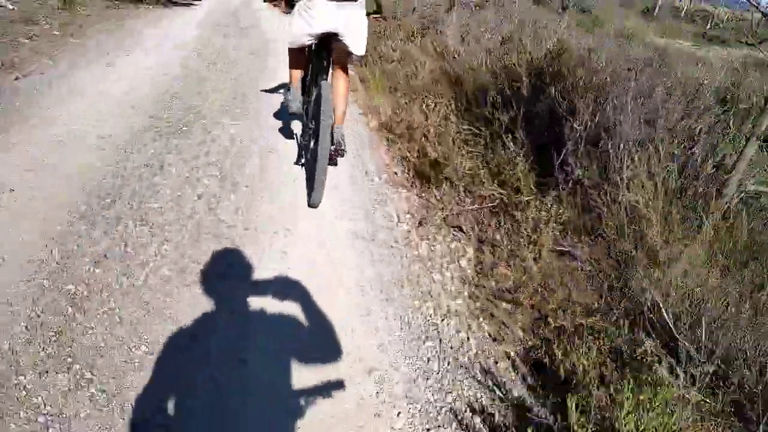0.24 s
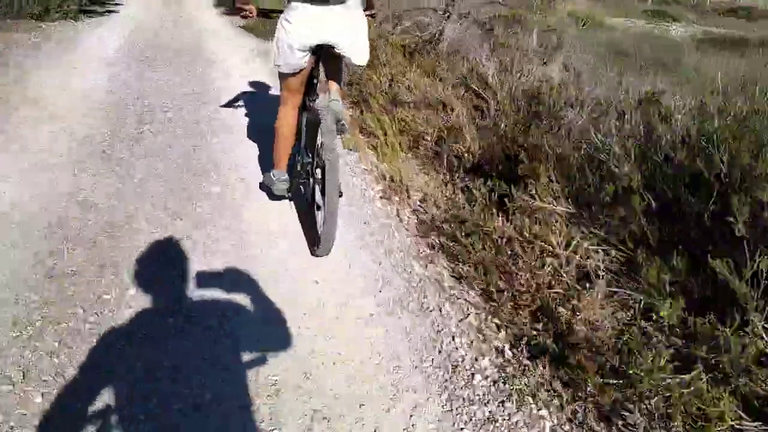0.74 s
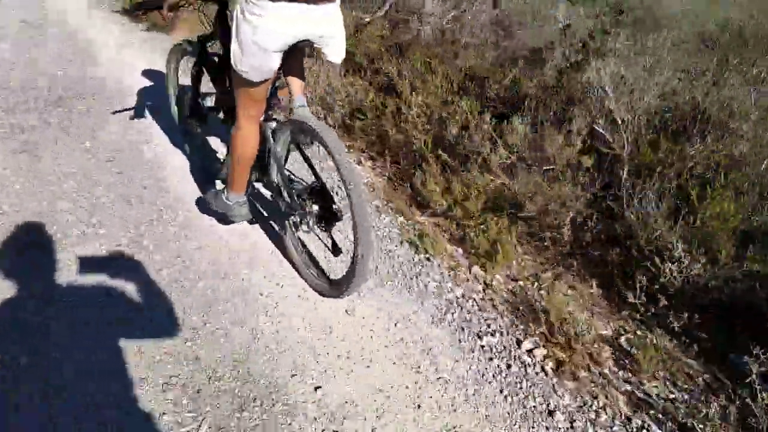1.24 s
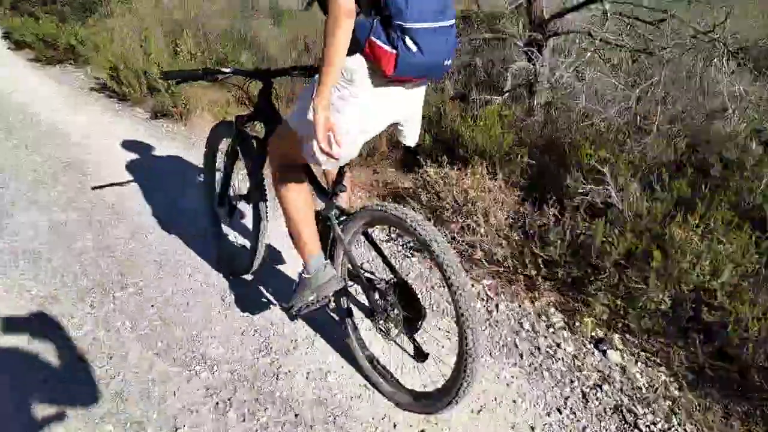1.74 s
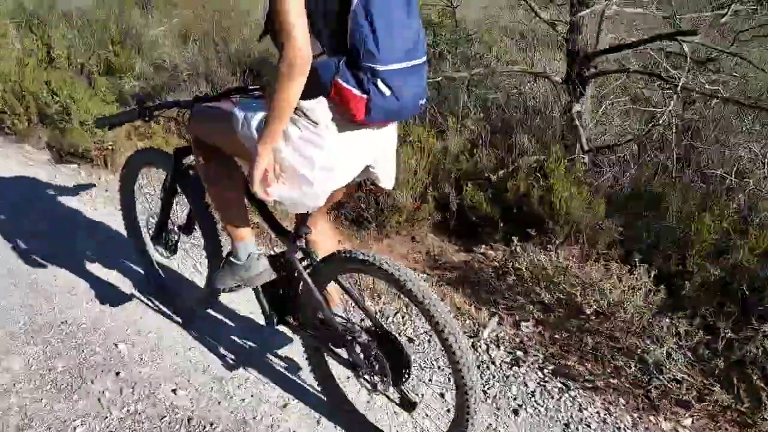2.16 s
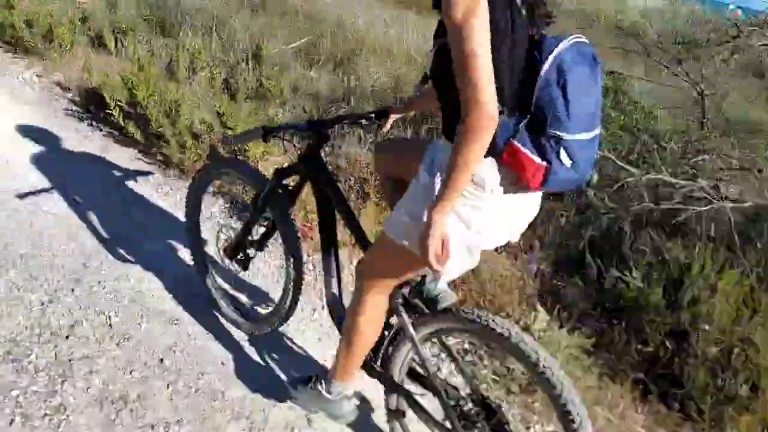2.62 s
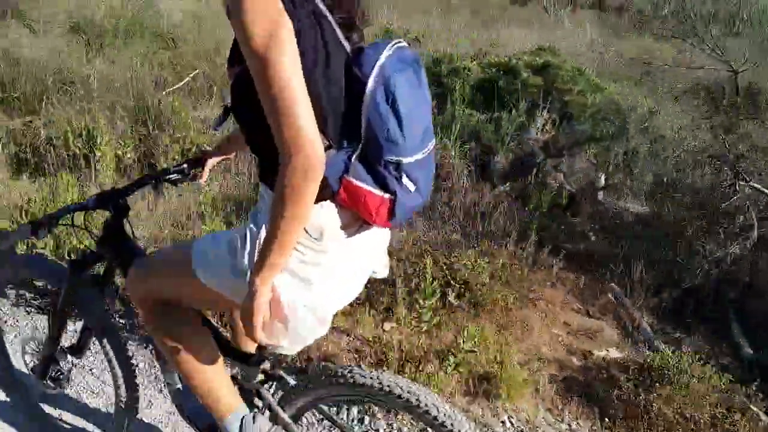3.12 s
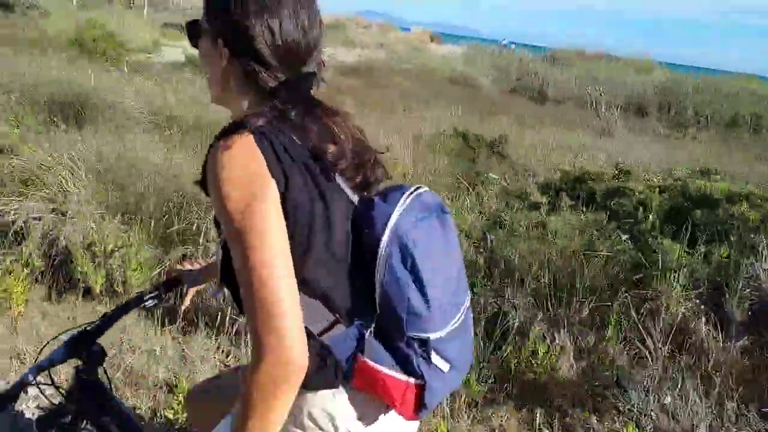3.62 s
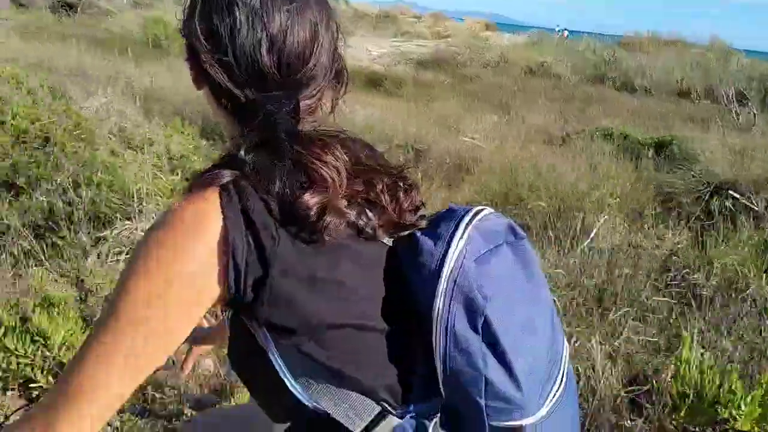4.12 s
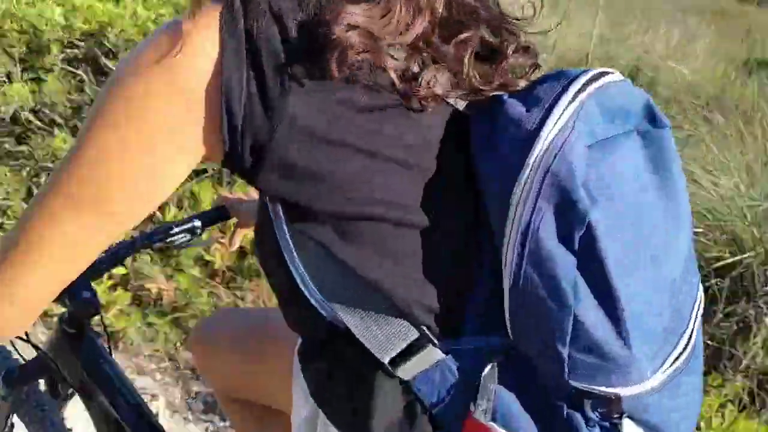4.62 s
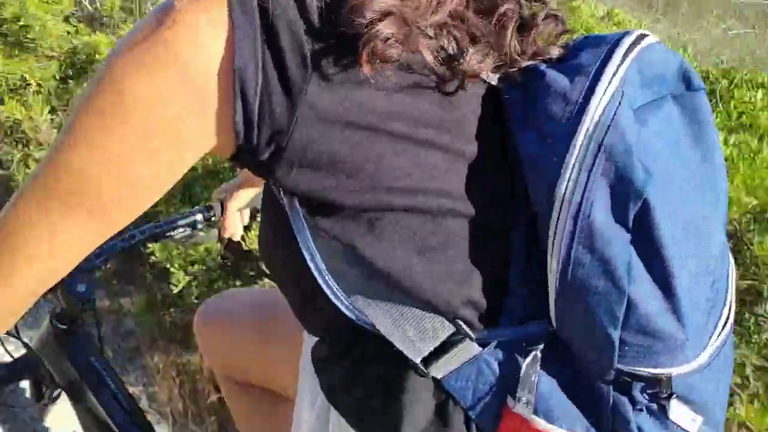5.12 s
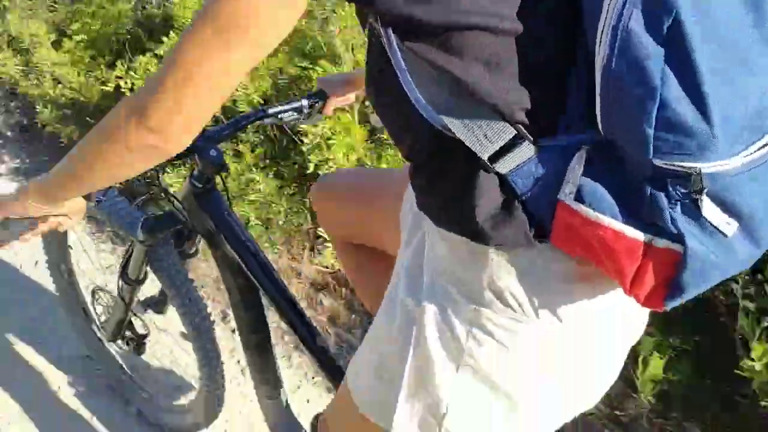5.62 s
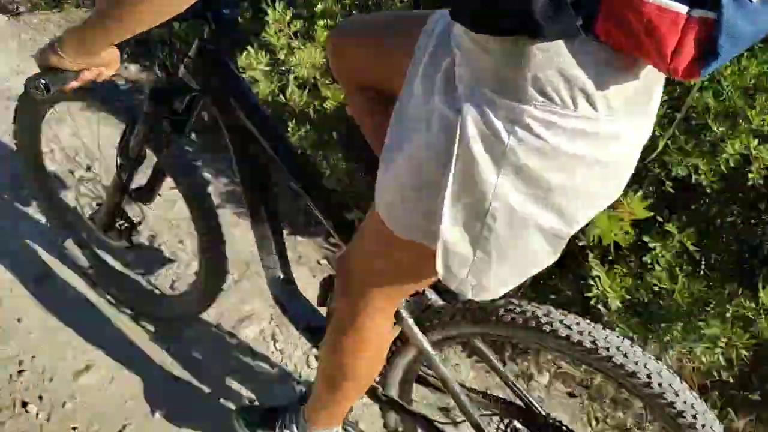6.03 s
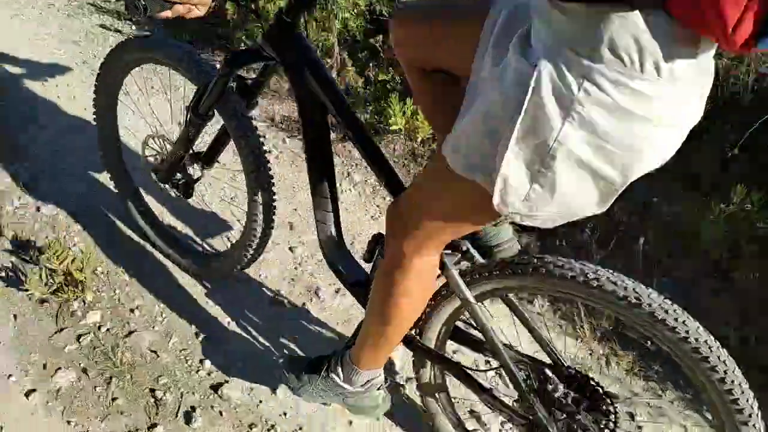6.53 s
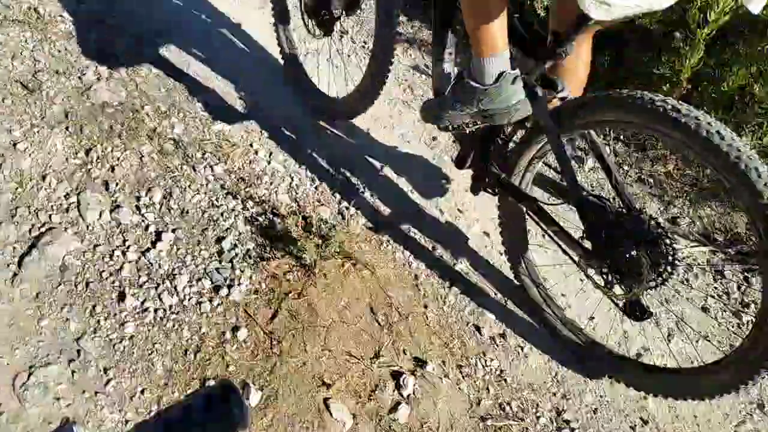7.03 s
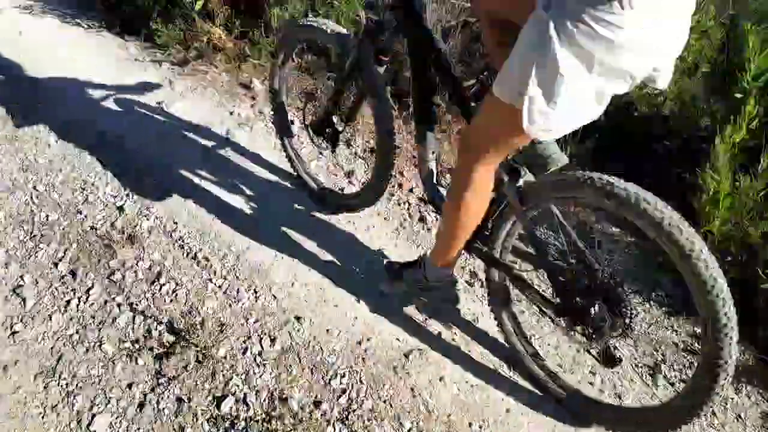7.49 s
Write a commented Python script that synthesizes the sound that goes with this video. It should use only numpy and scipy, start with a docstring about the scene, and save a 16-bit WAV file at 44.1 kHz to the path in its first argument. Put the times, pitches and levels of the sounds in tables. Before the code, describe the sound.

Mountain bikes roll along a stony track outdoors, grit hissing, stones pinging, chain slapping early, ratchet clicking, low wind buffeting unevenly.

```python
"""On a loose gravel track, mountain bikes roll slowly past the stones, heard from a phone in a rider's hand.
Wind is slow and sharp shaped noise with gusts, a higher roar and single low thumps; faint peeps are pure tones.
Noise bursts make the freewheel's timed ratchet teeth, the chain's slaps in two bands and loud bright clicks.
Stones pop as short swelling wavelets; the tyres crunch, hiss and rumble in clicks, tiny wavelets and noise."""
import sys
import numpy as np
from scipy import signal
from scipy.fft import rfft, irfft, next_fast_len
from scipy.io import wavfile
from scipy.ndimage import uniform_filter1d, map_coordinates

SR = 44100
rng = np.random.default_rng(int(sys.argv[2]) if len(sys.argv) > 2 else 0)


def unload_audio(sound):
    """Save the sound as a 16-bit wav file, at the path given as the first command line argument."""
    columns = np.transpose(np.atleast_2d(sound))
    # keep every value between -1 and 1, then stretch to whole-number steps
    steps = np.round(np.clip(columns, -1, 1) * 32767)
    wavfile.write(sys.argv[1], SR, steps.astype(np.int16))


N = 342216  # samples


def amp(db):
    """Gain of a level in dB."""
    return 10 ** (np.asarray(db) / 20)


def unit(x):
    """x at rms 1."""
    return x / np.sqrt(np.mean(x ** 2) + 1e-20)


def curves(rows):
    """One value per sample for each column after the time."""
    seconds, *columns = np.transpose(rows)
    t = np.arange(N) / SR
    return [np.interp(t, seconds, column) for column in columns]


def wobble(rate):
    """A smooth random curve, rate knots a second."""
    knots = rng.standard_normal(int(N * rate / SR) + 4)
    return map_coordinates(knots, [np.arange(N) * rate / SR])


def filtered(x, response):
    """x times a complex response of frequency."""
    size = next_fast_len(N + SR // 2)
    hz = np.fft.rfftfreq(size, 1 / SR)
    return irfft(rfft(x, size) * response(hz), size)[:N]


def colour(points):
    """Response through (Hz, dB) points on a log frequency axis."""
    f, db = np.transpose(points)
    return lambda hz: amp(np.interp(np.log(hz + 1), np.log(f + 1), db))


def resonances(modes):
    """Causal response of (Hz, width in Hz, dB) resonances, summed with alternating sign."""
    def response(f):
        total = 0
        for k, (centre, width, db) in enumerate(modes):
            damping = 1j * f * width
            total = total + (-1) ** k * amp(db) * damping / (centre ** 2 - f ** 2 + damping)
        return total
    return response


# Resonances of the microphone port. Each row: centre in Hz, width in Hz, gain in dB.
PORT_MODES = [(2130, 1030, -5.5), (4434, 1505, -1.5), (7804, 694, -4), (15980, 1450, 4.5)]


def through_port(x, points):
    """x in the colour of its source and of the microphone port."""
    return filtered(x, lambda hz: colour(points)(hz) * resonances(PORT_MODES)(hz))


def envelope(times, dbs, rise, t60):
    """Sum of quick swells and decays, each starting at its time; rise and t60 in seconds."""
    starts = np.bincount((np.asarray(times) * SR).astype(int), amp(dbs), N)[:N]
    t = np.arange(SR // 20) / SR
    swell = (1 - np.exp(-t / rise)) * amp(-60 * t / t60)
    return np.abs(signal.fftconvolve(starts, swell)[:N])


def wavelet(hz, cycles, phase, size):
    """Rows of sine that swell to a peak near 1 after the given cycles, then die fast."""
    u = np.arange(size) / SR * np.asarray(hz)[..., None] / cycles  # time over time of peak
    return np.sin(2 * np.pi * cycles * u + phase) * (u * np.exp(1 - u)) ** 2


def placed(times, rows):
    """Each row added at its time."""
    at = (np.asarray(times)[:, None] * SR).astype(int) + np.arange(rows.shape[1])
    return np.bincount(at.ravel(), rows.ravel(), N)[:N]


def steady(points, seconds):
    """Coloured noise with its own swells partly evened out over a short window."""
    x = filtered(rng.standard_normal(N), colour(points))
    power = np.abs(uniform_filter1d(x ** 2, int(seconds * SR)) + 1e-9)
    return unit(x / power ** 0.34)


def patchy(depth_db):
    """Noise whose colour changes from moment to moment."""
    z = signal.stft(rng.standard_normal(N), nperseg=256)[2]
    field = uniform_filter1d(rng.standard_normal(z.shape), size=5, axis=0)  # blurred over frequency
    field = uniform_filter1d(field, size=4, axis=1)  # and over time
    return signal.istft(z * amp(depth_db * unit(field)), nperseg=256)[1][:N]


# Faint high peeps. Each row: start in seconds, level in dB.
PEEPS = [(2.35, -50), (4.765, -52), (4.865, -48)]


def peeps():
    """Faint, short, high tones: a sine that swells for 80 cycles and dies."""
    s, db = np.transpose(PEEPS)
    tones = wavelet(np.full(len(s), 11050), 80, 0, size=SR // 20)
    return placed(s, amp(db)[:, None] * tones)


# Changing breeze on the port. Each row: time in seconds, level in dB.
BREEZE = [(0, -36), (.4, -34), (.6, -31.5), (1.17, -43.5), (1.42, -35), (1.68, -38.5), (1.74, -34),
          (2.33, -37.5), (2.4, -55), (2.62, -35.5), (3.2, -33), (3.5, -44), (4.04, -31), (4.36, -46),
          (4.73, -27), (5.2, -42), (5.28, -32), (6.28, -35), (6.45, -32.5), (6.88, -48), (7.76, -35.5)]
# Separate gusts, strong and weak. Each row: start in seconds, length of the body in seconds, peak level in dB.
GUSTS = [(0.048, .13, -24.5), (0.438, .11, -21.5), (0.738, 0.29, -27), (3.67, .17, -18.5),
         (3.9, 0.054, -26.5), (4.09, 0.094, -21.5), (4.228, 0.03, -38), (6.52, .1, -22.5),
         (6.998, 0.31, -33), (7.38, 0.11, -36)]
GUST_RISE_S, GUST_FALL_S = 0.026, 0.032
GUST_ONSET, GUST_PEAK_AT, GUST_END = 0.48, 0.66, 0.51  # gain after the rise, peak's place in the body, end gain


def wind_db():
    """The breeze with the gusts on top: each sets in, swells to a peak and drops away."""
    breeze_db, = curves(BREEZE)
    t = np.arange(N) / SR
    gusts = np.zeros(N)
    for start, body, db in GUSTS:
        spans = [0, GUST_RISE_S, GUST_PEAK_AT * body, (1 - GUST_PEAK_AT) * body, GUST_FALL_S]
        shape = np.interp(t, start + np.cumsum(spans), [0, GUST_ONSET, 1, GUST_END, 0])
        gusts += amp(db) * shape
    return 20 * np.log10(amp(breeze_db) + gusts)


# Balance of the sharp eddies. Each row: time in seconds, level over the buffet in a middling wind in dB.
EDDY_BALANCE = [(0, -13), (2.3, -14.5), (3, -6.5), (4.2, -7), (5.2, -15.5), (6.2, -4.5), (6.6, -9),
                (7.76, -12.5)]
# Colour of the slow buffeting. Each row: frequency in Hz, gain in dB.
BUFFET_COLOUR = [(8.8, -52), (15, 5), (45, 8), (128, -2.5), (268, -28), (300, -47), (390, -74), (660, -120)]
# Colour of the sharp eddies. Each row: frequency in Hz, gain in dB.
EDDY_COLOUR = [(60, -37), (130, 8), (250, -1), (450, -18.5), (900, -20), (2000, -94)]
# Colour of the higher roar. Each row: frequency in Hz, gain in dB.
ROAR_COLOUR = [(200, 0), (400, 8), (800, -12), (1500, -38)]
MIDDLING_DB = -35
EDDY_GROWS, ROAR_GROWS = 0.87, 1.96  # dB per dB: eddies with the buffet, roar with the eddies
ROAR_DB = -18  # roar over the eddies when these are at the middling level


def wind():
    """Pressure lumps on the port; small eddies come in shorter bursts, and stronger wind roars higher."""
    eddy_db, = curves(EDDY_BALANCE)
    buffet_db = wind_db() + 2.37 * wobble(8)
    sharp_db = MIDDLING_DB + eddy_db + EDDY_GROWS * (buffet_db - MIDDLING_DB)
    roar_db = sharp_db + ROAR_DB + (ROAR_GROWS - 1) * (sharp_db - MIDDLING_DB)
    lumps = wobble(18)
    flutter = amp(2 * lumps + 3 * wobble(45))
    buffet = unit(amp(2.7 * lumps) * steady(BUFFET_COLOUR, 0.0635))
    eddies = unit(flutter * steady(EDDY_COLOUR, 0.031))
    roar = unit(flutter * steady(ROAR_COLOUR, 0.022))
    return amp(buffet_db) * buffet + amp(sharp_db) * eddies + amp(roar_db) * roar


# Single eddies hitting the port. Each row: start in seconds, level in dB, pitch in Hz.
THUMPS = [(0.156, -27, 122), (0.44, -25, 105), (0.549, -23, 196), (0.824, -21, 148), (1.025, -30, 90),
          (1.72, -25, 70), (2.301, -26.5, 90), (2.65, -22.5, 102), (2.79, -18.5, 160), (3.639, -26, 91.5),
          (3.757, -12.5, 215), (3.808, -11, 170), (3.857, -13.5, 143), (3.954, -17, 141), (4.105, -23, 223),
          (4.178, -11, 114), (5.42, -24, 118), (6.15, -21.5, 180), (6.255, -18.5, 110), (6.271, -17.5, 135),
          (6.588, -19.5, 151), (7.2, -22, 99), (7.393, -21.5, 145), (7.439, -23, 149), (7.707, -23, 104)]
EDGE_PITCH, EDGE_DB = 2.716, -14  # the steep front: pitch ratio and level over the body


def thumps():
    """A single eddy pushes the membrane in, with a steep front, and lets it go."""
    s, db, hz = np.transpose(THUMPS)
    phase = 2 * np.pi * rng.random((len(s), 2))
    body = wavelet(hz, 0.6, phase[:, :1], size=SR // 10)
    edge = wavelet(EDGE_PITCH * hz, 1.6, phase[:, 1:], size=SR // 10)
    return placed(s, amp(db)[:, None] * (body + amp(EDGE_DB) * edge))


# Pace of the freewheel. Each row: time in seconds, ratchet teeth per second.
RATCHET_SPEED = [(1.3, 36.76), (1.8, 31.45), (2.6, 30.67), (3.2, 32.49), (4.3, 30.48), (5.8, 31.82),
                 (6.1, 28.44), (6.9, 34.85), (7.7, 20.22)]
# Loudness of the freewheel. Each row: time in seconds, tick level in dB.
TICK_LEVEL = [(1.3, -31.5), (1.9, -38.5), (2.8, -33.5), (3.5, -37), (5.6, -33), (6.1, -29), (7.7, -33.5)]
# Bright colour of the ticks and the loud clicks. Each row: frequency in Hz, gain in dB.
TICK_COLOUR = [(3000, -8), (7000, -8.5), (8500, 1.5), (10300, 0.5), (12500, 0.5), (15300, -1), (16000, -12)]
FIRST_DROP_S = 1.301


def freewheel():
    """The pawls drop over each tooth, a little unevenly, and land a second time with a shorter tick."""
    speed, = curves(RATCHET_SPEED)
    passed = np.cumsum(speed[int(FIRST_DROP_S * SR):]) / SR  # teeth gone by
    drops = FIRST_DROP_S + np.searchsorted(passed, np.arange(int(passed[-1]))) / SR
    chance = rng.standard_normal((len(drops), 4))
    db = np.interp(drops, *np.transpose(TICK_LEVEL)) + 2 * chance[:, 0]
    first = envelope(drops + 0.0023 * chance[:, 1], db, rise=0.0018, t60=0.037)
    second_s = drops + 0.011 + 0.0045 * chance[:, 2]
    second = envelope(second_s, db + 1.5 + 3 * chance[:, 3], rise=0.00046, t60=0.0047)
    return (first + second) * unit(through_port(patchy(2.5), TICK_COLOUR))


# Colour of the duller part of a contact. Each row: frequency in Hz, gain in dB.
BODY_COLOUR = [(600, -22), (2000, -2.5), (5000, -0.5), (9000, 8.5), (12000, -23)]


def bursts(s, db, bright, body_db, rise, t60):
    """Short contacts: a bright burst and a broader, duller one of varying share."""
    body = unit(through_port(rng.standard_normal(N), BODY_COLOUR))
    dull_db = db + rng.normal(body_db, 4, len(s))
    return (envelope(s, db, rise=rise, t60=t60) * bright
            + envelope(s, dull_db, rise=0.00051, t60=t60) * body)


# Chain slaps. Each row: start in seconds, level in dB.
SLAPS = [(0.609, -24), (0.6542, -19), (0.6957, -25.5), (0.7417, -33), (0.7935, -14), (0.879, -16.5),
         (0.9, -15.5), (0.996, -16), (1.0231, -23), (1.057, -15), (1.086, -21.5), (1.107, -24),
         (1.1308, -23), (1.1535, -25.5), (1.1667, -25), (1.191, -24)]
# Ringing bands of the chain. Each row: centre in Hz, width in Hz, gain in dB.
CHAIN_MODES = [(10260, 200, 1.5), (13840, 180, 7)]
REBOUND_S, REBOUND_DB = .011, -16  # each slap lands again, softer


def chain():
    """The slack chain slaps the frame, rebounds and rings in two bands."""
    s, db = np.transpose(SLAPS)
    ring = unit(filtered(rng.standard_normal(N), resonances(CHAIN_MODES)))
    s, db = np.r_[s, s + REBOUND_S], np.r_[db, db + REBOUND_DB]
    return bursts(s, db, ring, body_db=-9, rise=0.00094, t60=0.016)


# Loud bright clicks, many of them strong or irregular freewheel ticks.
# Each row: start in seconds, level in dB.
CLICKS = [(0.2773, -28), (0.3047, -33), (0.4153, -25), (0.443, -27), (1.242, -25.5), (1.284, -25.5),
          (1.5054, -22), (1.583, -25), (1.735, -28), (2.828, -21.5), (3.2363, -27.5), (4.5343, -24),
          (5.153, -23.5), (5.7688, -33), (5.7856, -11.5), (6.026, -27), (6.188, -21), (6.6537, -21),
          (6.71, -24.5), (6.7645, -26), (6.781, -20.5), (6.8309, -23), (6.9478, -23), (7.0264, -39),
          (7.1337, -34), (7.1547, -31), (7.218, -24.5)]
STRAY_DB, STRAY_SPREAD_DB = -34, 10  # mean and spread of the random clicks


def bright_clicks(count=20):
    """Hard contacts, many of them strong or irregular freewheel ticks, plus stray clicks at random."""
    s, db = np.transpose(CLICKS)
    s = np.r_[s, rng.uniform(0, N / SR, count)]
    db = np.r_[db, rng.normal(STRAY_DB, STRAY_SPREAD_DB, count)]
    bright = unit(through_port(patchy(2.5), TICK_COLOUR))
    return bursts(s, db, bright, body_db=-14, rise=0.0006, t60=0.019)


SMALL_POP_DB, SMALL_POP_HZ = -30.5, 1710  # middle of the random spread


def small_pops(count):
    """Smaller stones scattered by chance, as rows of seconds, dB, Hz."""
    chance = rng.standard_normal((count, 2))
    s = rng.uniform(.01, N / SR, count)
    return np.c_[s, SMALL_POP_DB + 3 * chance[:, 0], SMALL_POP_HZ * np.exp(.15 * chance[:, 1])]


# Stones jumping free. Each row: start in seconds, level in dB, pitch in Hz.
POPS = [(0.125, -24, 1880), (0.473, -20, 1780), (0.69, -21, 1590), (0.986, -22, 1920), (0.996, -21, 1890),
        (1.126, -21, 1280), (1.242, -30, 1870), (1.342, -25, 1100), (1.834, -20.5, 1830),
        (1.982, -23.5, 1740), (2.139, -10.5, 1710), (2.411, -15.5, 1820), (2.418, -22, 1500),
        (2.858, -19, 1830), (3.174, -14, 1640), (3.277, -25, 1700), (3.68, -23, 1600), (4.028, -20.5, 1460),
        (4.296, -21.5, 1660), (4.614, -14.5, 1690), (4.895, -16.5, 1850), (4.929, -14, 1640),
        (5.461, -21, 1440), (5.674, -22, 1840), (5.695, -17, 1600), (5.701, -12, 1610),
        (5.867, -20.5, 1640), (5.926, -20, 1620), (6.063, -21, 1400), (6.483, -19, 1650),
        (6.517, -22.5, 880), (7.048, -22, 1900), (7.203, -19, 1540), (7.265, -25, 1430)]
# Colour of coarse gravel, shared with the tyres. Each row: frequency in Hz, gain in dB.
CRUNCH_COLOUR = [(150, 5), (500, 12), (1100, 2), (2000, -6), (2800, -23), (6000, -25), (16000, -56)]
POP_S = 0.00075  # time from the start of a jump to its peak


def stones():
    """A squeezed stone jumps free with a dull knock under it; its neighbours shift around it."""
    s, db, hz = np.r_[POPS, small_pops(count=30)].T
    phase = 2 * np.pi * rng.random((len(s), 2))
    pop = wavelet(hz, POP_S * hz[:, None], phase[:, :1], size=800)
    knock = amp(-19.5) * wavelet(0.605 * hz, 0.7, phase[:, 1:], size=800)
    settling = envelope(s - .003, db - 8.0, rise=0.0051, t60=0.033)
    gravel = unit(through_port(rng.standard_normal(N), CRUNCH_COLOUR))
    return placed(s, amp(db)[:, None] * (pop + knock)) + settling * gravel


def grains(rate, spread_db, noise_db):
    """Random clicks of unequal size, rate a second on average, on a bed of noise."""
    size_db = spread_db * np.minimum(rng.exponential(size=N), 3.5)
    clicks = (rng.random(N) < rate / SR) * rng.standard_normal(N) * amp(size_db)
    return unit(clicks) + amp(noise_db) * patchy(1.95)


def pebbles(count, centre_hz, spread_db):
    """Many small stones slipping, each at its own pitch."""
    chance = rng.random((count, 2))
    hz = centre_hz * np.exp(0.29 * rng.standard_normal(count))
    size_db = spread_db * np.minimum(rng.exponential(size=count), 3)
    rows = amp(size_db)[:, None] * wavelet(hz, 1.24, 2 * np.pi * chance[:, :1], size=260)
    return unit(placed(chance[:, 1] * N / SR, rows))


# Rolling levels. Each row: time in seconds, crunch in dB, fine grit in dB.
ROLLING = [(0.0, -44.5, -48.5), (0.34, -44.5, -55), (0.73, -39.5, -52), (1.1, -37.5, -44.5),
           (1.92, -45, -53.5), (2.48, -42, -50), (3.72, -42.5, -54), (4.28, -35.5, -42.5),
           (4.88, -37, -45.5), (5.25, -39.5, -45.5), (6.46, -44, -48.5), (6.94, -36.5, -45),
           (7.76, -43.5, -51.5)]
# Colour of the even hiss. Each row: frequency in Hz, gain in dB.
HISS_COLOUR = [(1500, 10), (3200, -10), (5000, 5), (8200, 2), (9500, -9.5), (16000, -39)]
# Colour of the fine grit. Each row: frequency in Hz, gain in dB.
GRIT_COLOUR = [(6000, -36), (9500, 5.5), (12000, 3), (14000, 2.5), (15400, -8), (16000, -3)]


def tyres():
    """Coarse gravel crunches in clumps, finer gravel hisses evenly, the tread rumbles."""
    crunch_db, grit_db = curves(ROLLING)
    hiss_db = -30.5 + 0.36 * crunch_db  # the even hiss follows the crunch only weakly
    clumps = wobble(14)
    hiss_flicker_db = .6 * clumps + .7 * wobble(9)
    slip_noise = filtered(patchy(2.04), resonances([(1316, 2600, 0)]))
    slips = pebbles(count=6500, centre_hz=1570, spread_db=6.0) + amp(11.0) * slip_noise
    crunch = unit(through_port(slips, CRUNCH_COLOUR))
    hiss = unit(through_port(grains(1500, spread_db=0.5, noise_db=4.0), HISS_COLOUR))
    # handfuls of fine grit
    sprays = envelope(rng.uniform(0, N / SR, 600), rng.normal(0, 2.9, 600), rise=0.0012, t60=0.011)
    grit = unit((0.36 + sprays) * through_port(patchy(3.7), GRIT_COLOUR))
    tread = unit(filtered(rng.standard_normal(N), resonances([(196, 730, 0)])))
    return (amp(crunch_db + clumps + 2.48 * wobble(50)) * crunch
            + amp(hiss_db + hiss_flicker_db) * hiss
            + amp(grit_db + 0.93 * wobble(16)) * grit
            + amp(crunch_db - 10.5 + 0.4 * clumps) * tread)


def scene():
    """All sources at one microphone."""
    air = peeps() + wind() + thumps()
    bike = freewheel() + chain() + bright_clicks()
    return (air + bike + stones() + tyres())[None]


TOP_HZ = 15820


def record(dry):
    """The phone keeps nothing above its band limit."""
    return filtered(dry[0], lambda hz: hz < TOP_HZ)[None]


dry = scene()
out = record(dry)
unload_audio(out)
```